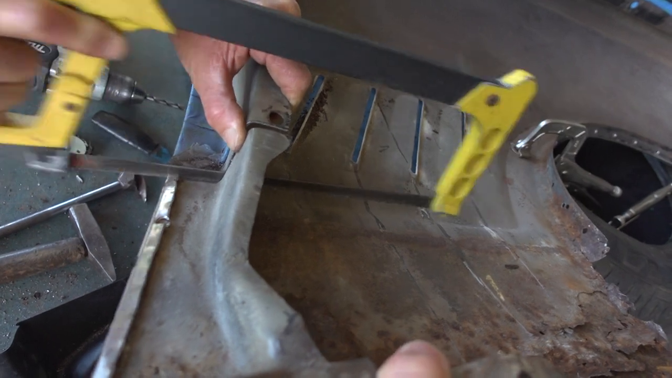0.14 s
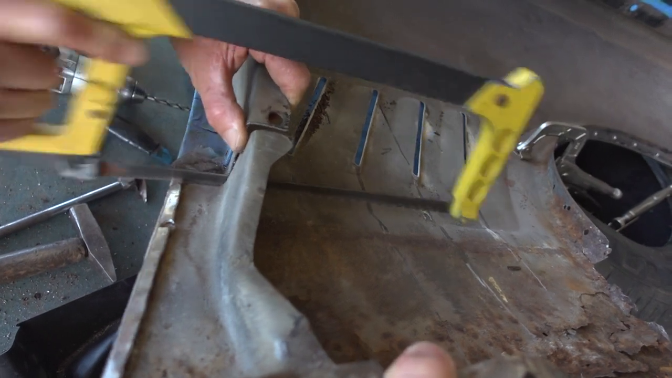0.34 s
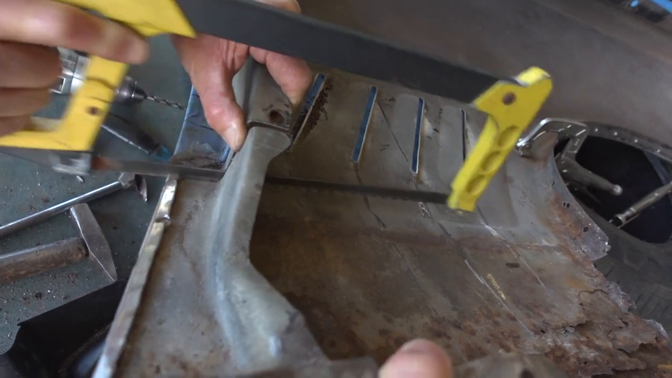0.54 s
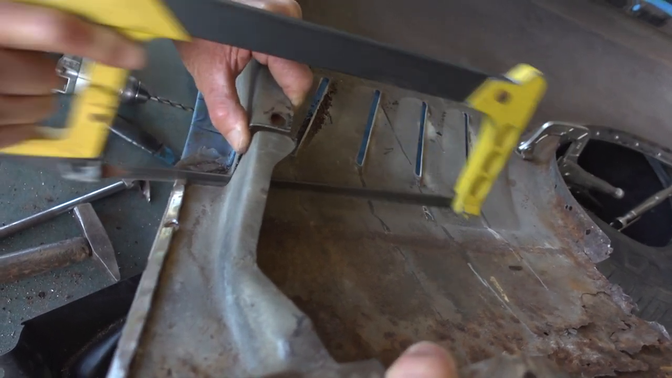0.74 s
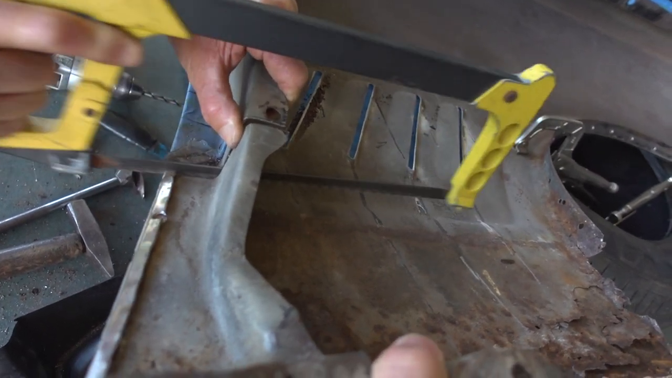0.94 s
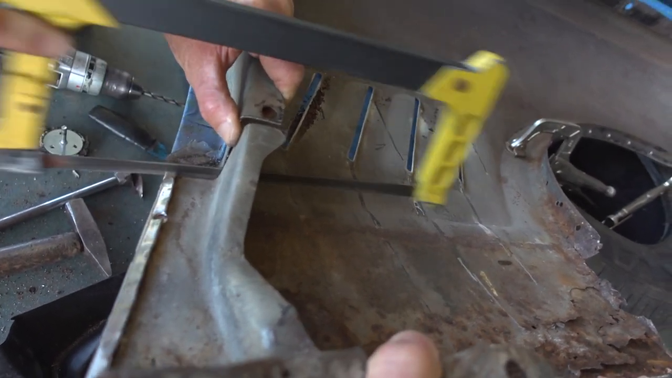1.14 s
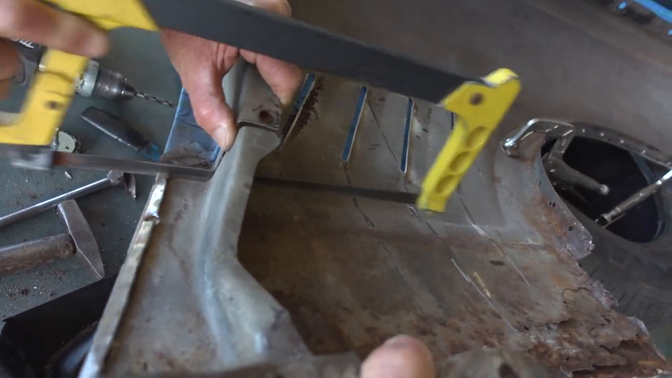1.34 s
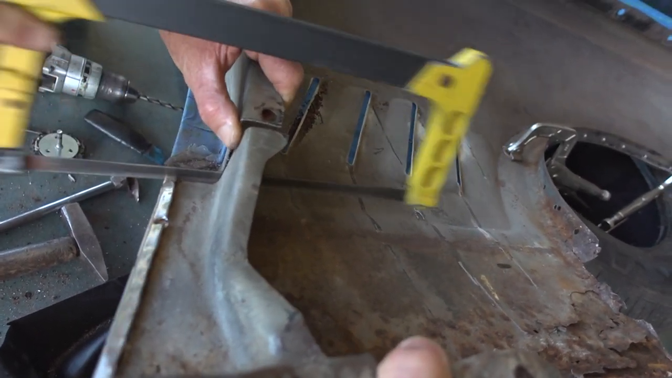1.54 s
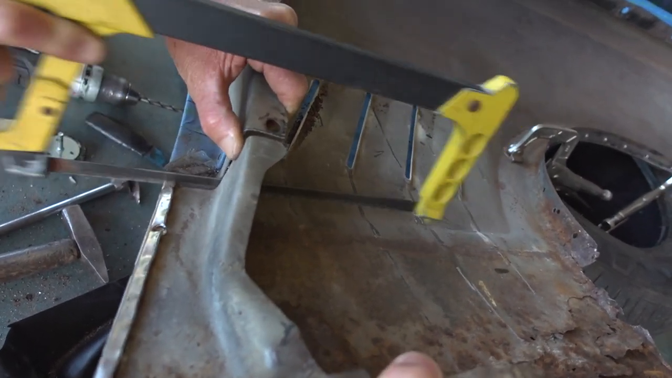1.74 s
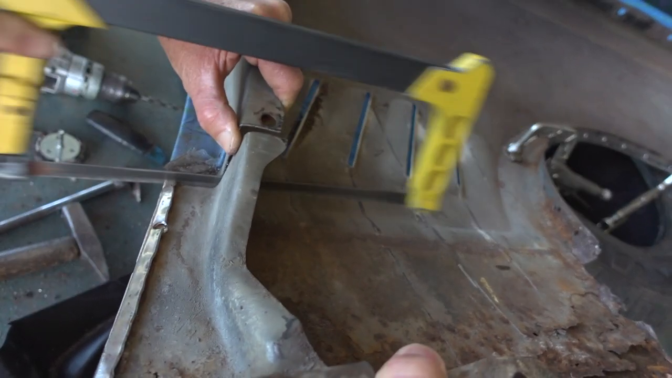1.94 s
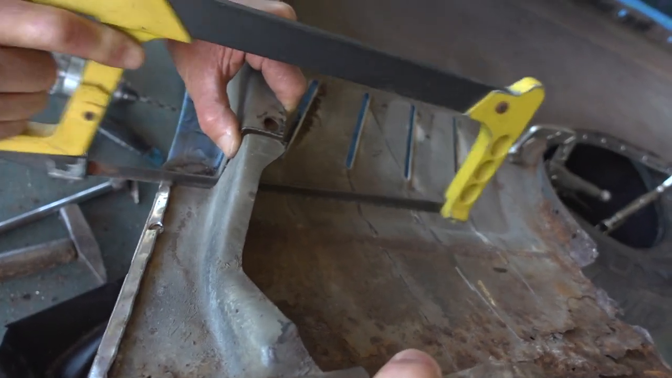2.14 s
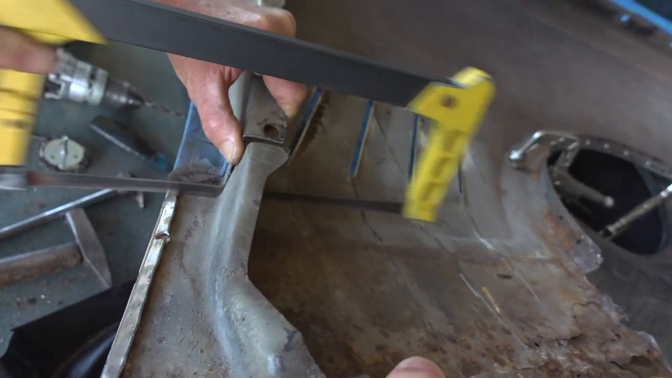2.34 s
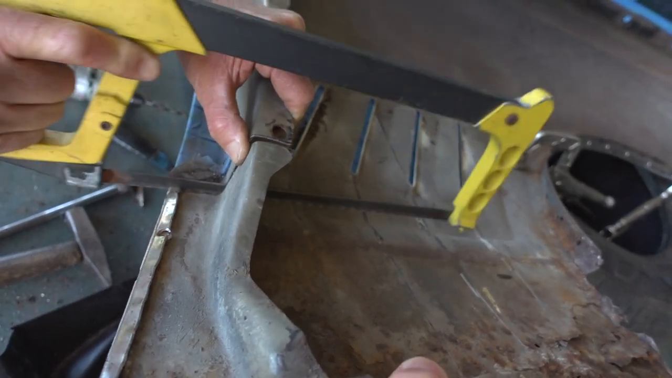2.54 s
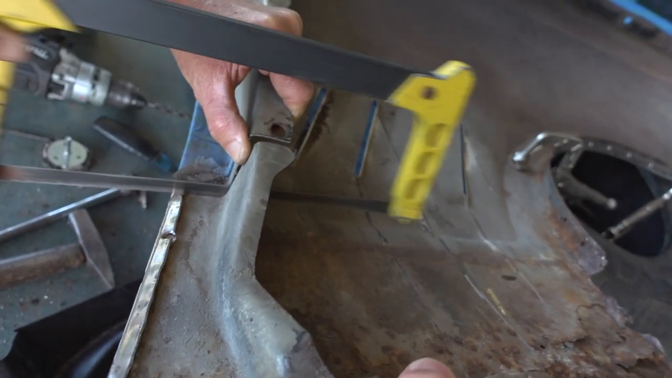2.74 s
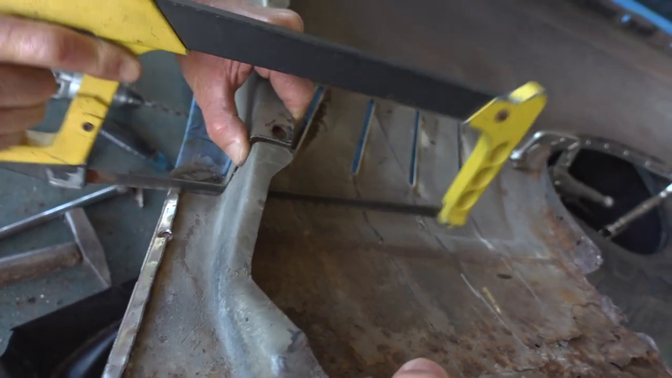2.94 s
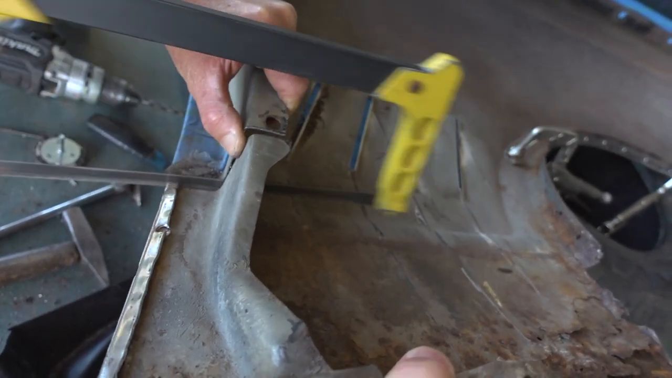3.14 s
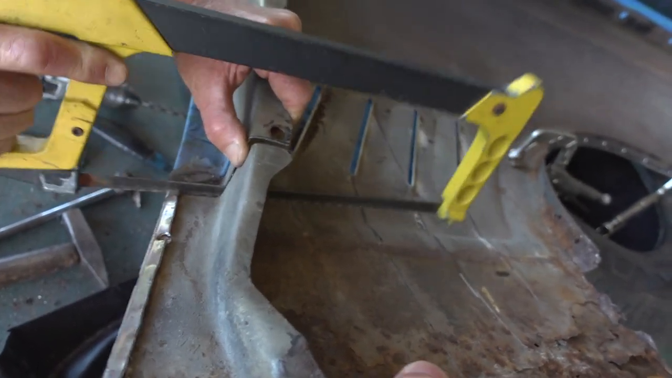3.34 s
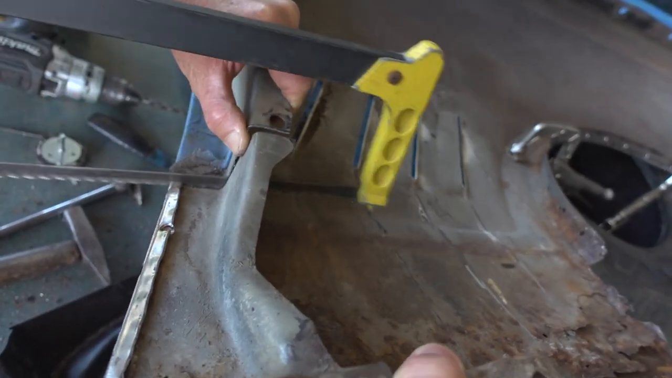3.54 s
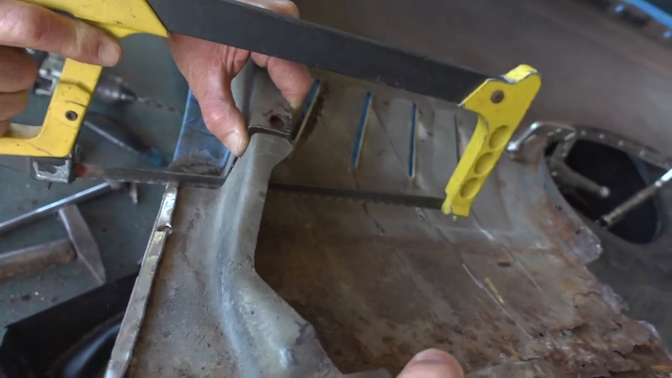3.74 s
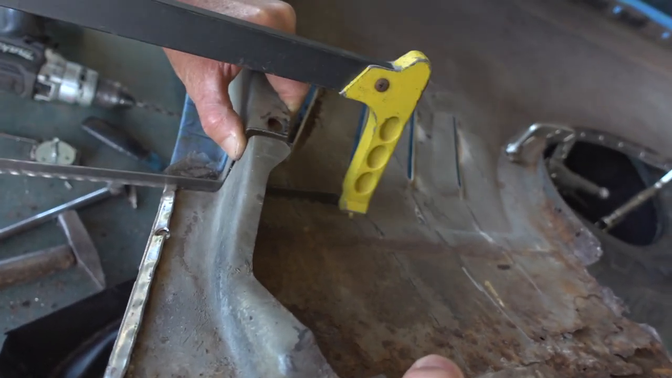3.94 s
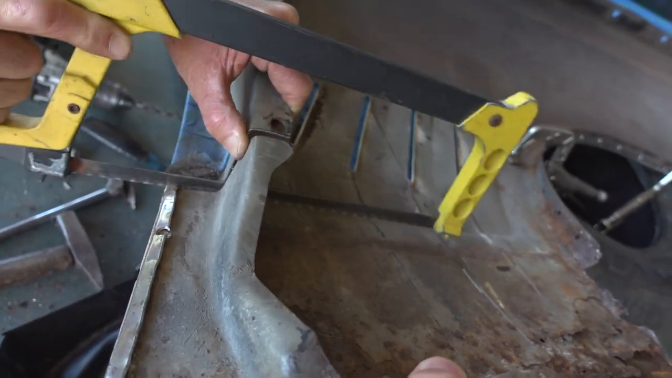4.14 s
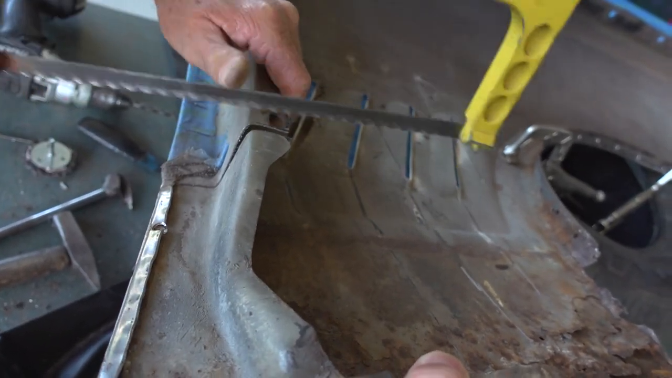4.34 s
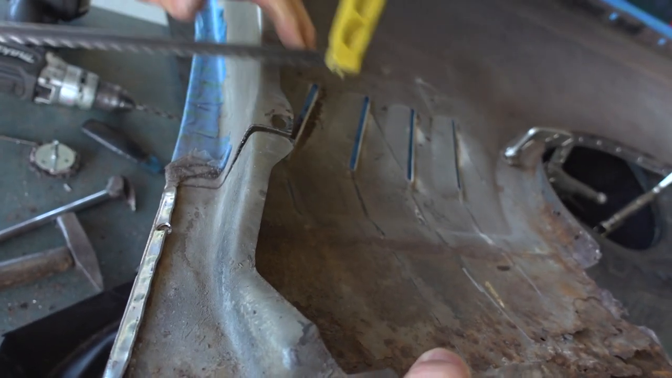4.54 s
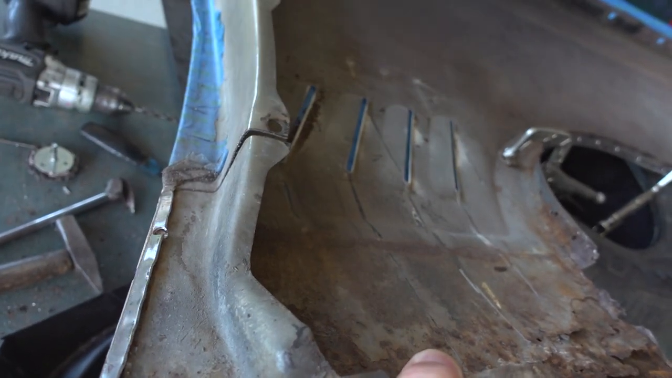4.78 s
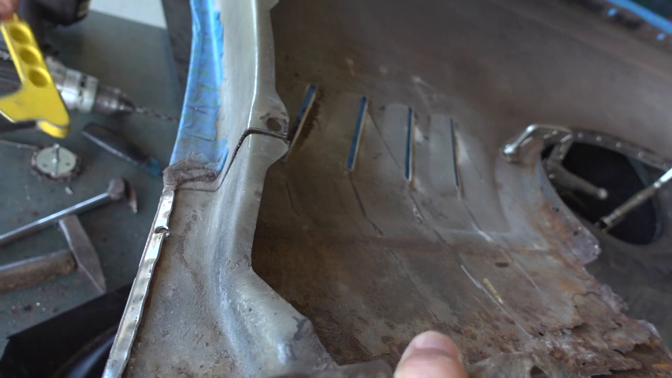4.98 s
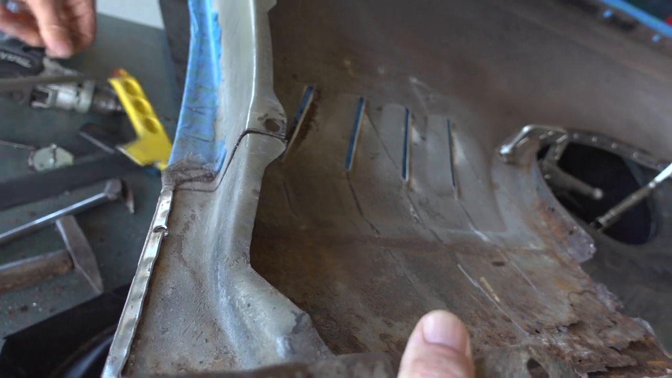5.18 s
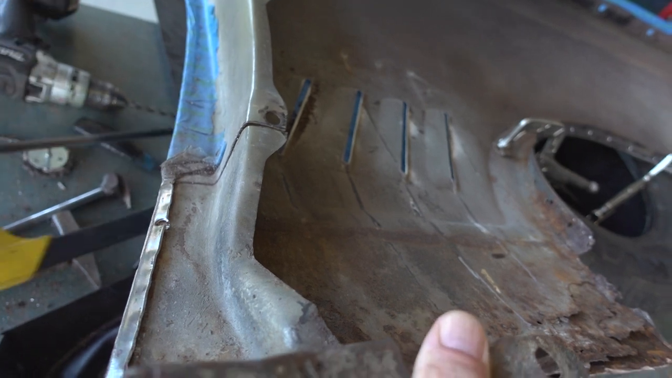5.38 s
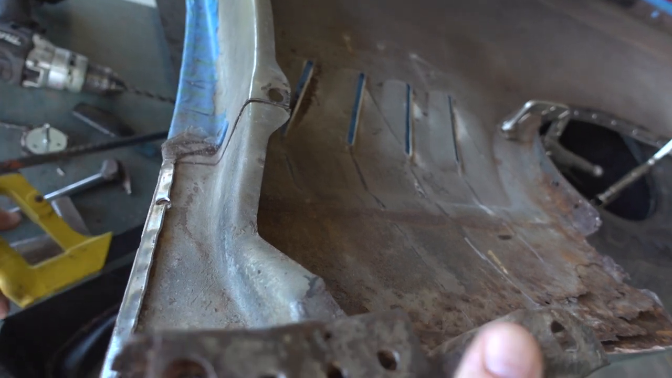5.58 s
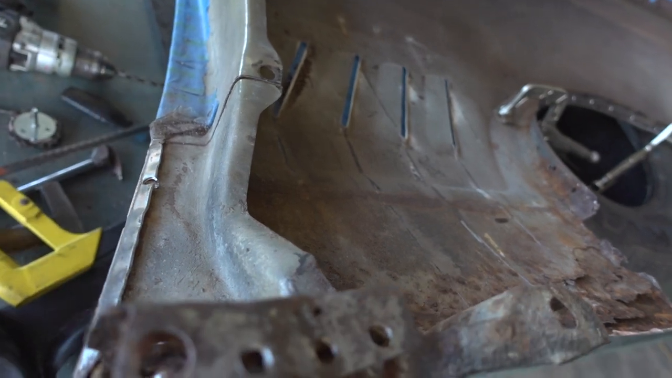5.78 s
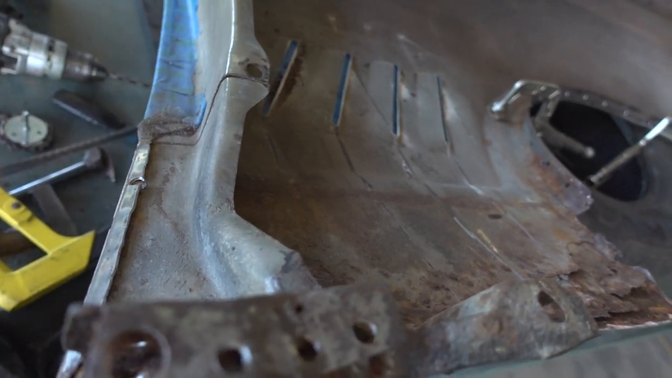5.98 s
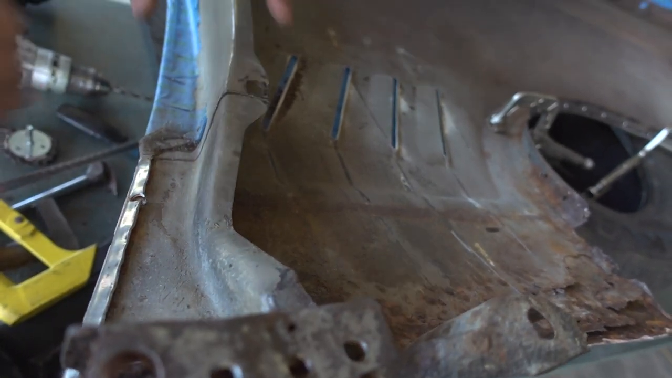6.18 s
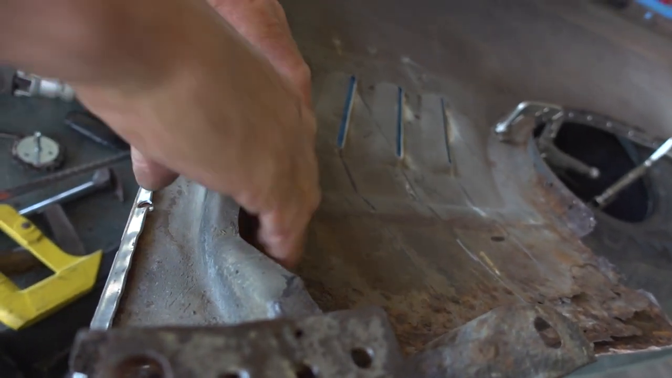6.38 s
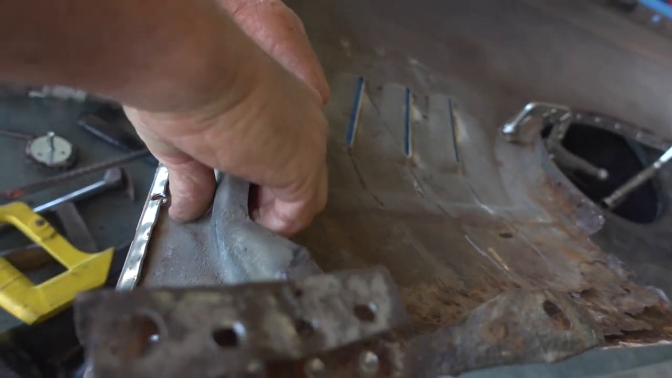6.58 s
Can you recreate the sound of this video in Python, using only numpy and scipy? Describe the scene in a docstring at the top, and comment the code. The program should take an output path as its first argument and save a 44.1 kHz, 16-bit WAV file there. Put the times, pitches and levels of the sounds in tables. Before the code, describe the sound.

Quick, hissing hacksaw strokes cut a steel panel in a workshop, followed by the saw clanking down onto loose metal tools.

```python
"""Hacksaw on a steel panel

A hand hacksaw cuts a sheet-steel body panel in a workshop, about five strokes a second. The teeth tear
off chips with a rasp and a hiss, the taut blade sings and the panel rumbles underneath. The blade snags,
then breaks out of the cut and rings. The saw is dropped among loose tools; a hand rubs the panel."""
import sys
import numpy as np
from scipy import signal
from scipy.fft import rfft, irfft, next_fast_len
from scipy.io import wavfile
from scipy.ndimage import uniform_filter1d, map_coordinates

SR = 44100
rng = np.random.default_rng(int(sys.argv[2]) if len(sys.argv) > 2 else 0)


def file_out(sig):
    """Save sig as 16-bit WAV at sys.argv[1]."""
    # one column per channel
    cols = np.atleast_2d(sig).T
    # limit, then scale
    lim = np.clip(cols, -1, 1)
    pcm = np.round(lim * 32767).astype(np.int16)
    wavfile.write(sys.argv[1], SR, pcm)


N = 291942
TIME = np.arange(N) / SR

# push and pull in turn: start/s, end/s, rise/s, level/dB, rumble surge/dB
STROKES = [(-.059, .04, 0.021, -22, -24.5), (.169, .294, .022, -20, -24.5), (.322, .442, .016, -20.5, -22),
           (.587, .697, 0.023, -20, -25.5), (.732, .839, 0.017, -21.5, -21.5),
           (.99, 1.114, .013, -20, -25.5), (1.147, 1.252, 0.015, -20.5, -27.5),
           (1.386, 1.502, 0.041, -19.5, -25.5), (1.541, 1.652, .019, -20, -23),
           (1.775, 1.906, .027, -20, -23.5), (1.936, 2.076, .019, -21, -24.5),
           (2.188, 2.317, .03, -20.5, -25), (2.356, 2.47, .015, -20, -25), (2.622, 2.733, 0.047, -19, -27),
           (2.778, 2.88, .015, -20.5, -24.5), (3.019, 3.137, 0.05, -20.5, -24.5),
           (3.172, 3.272, .017, -20.5, -26.5), (3.448, 3.56, 0.029, -20.5, -23.5),
           (3.599, 3.72, .013, -21, -25), (3.864, 3.985, .009, -19, -32), (4.017, 4.144, 0.019, -19, -25),
           (4.275, 4.345, 0.021, -22.5, -36)]
# the panel gives more as the last of the steel is cut: t/s, extra rumble/dB
LOOSENESS = [(3.45, -4.5), (3.95, 12.5), (4.13, 8), (4.24, -7.5)]


def sawing():
    """The teeth bite while the blade moves and ease off at each turn; the panel shakes under them."""
    speed, rasp, hiss, shake = arm()
    stroke_ends = np.array(STROKES)[:, :2].ravel()
    travel = np.interp(TIME, stroke_ends, np.resize([-1, 1, 1, -1], len(stroke_ends)))
    cut = cutting(speed, travel, rasp, hiss) + rasp * bending_waves(travel)
    twang = blade_song(speed / level(LOOSENESS), lag_s=.028, waver_db=2)
    return cut + twang + shake * panel_rumble(speed)


def arm():
    """The strokes as envelopes of speed, rasp, hiss and panel shake, until the blade breaks out."""
    # fall/s, hiss over rasp/dB, first surge over last/dB, last surge's decay/s
    push, pull = (.0245, 1, -4.5, .07), (.022, -.0011, -1.2, .027)
    speed, rasp, hiss, surge_power = np.zeros((4, N))
    for k, (start, end, rise, db, surge_db) in enumerate(STROKES):
        fall, hiss_db, first_db, dies_s = pull if k % 2 else push
        bite = swell(start, end, rise, fall)
        speed += bite
        rasp += from_db(db) * bite
        hiss += from_db(db + hiss_db) * bite ** 1.38  # hiss grows faster than speed
        # the rumble swells just inside each end of the stroke
        surge_power += (from_db(surge_db + first_db) * surge(start + .018, dies_s=.041)) ** 2
        surge_power += (from_db(surge_db) * surge(end - .008, dies_s)) ** 2
    breakout_s, drag = 4.334, from_db(-48.5)
    in_cut = (1 + np.tanh((breakout_s - TIME) / .008)) / 2
    loose = level(LOOSENESS)
    stroke_rumble, turn_rumble = from_db(-33.5) * loose * speed, from_db(-37.5)
    shake = np.sqrt(surge_power + stroke_rumble ** 2 + turn_rumble ** 2)
    hiss = (hiss + drag) / loose ** .36  # a loose panel hisses less
    return in_cut * np.array([speed, rasp + drag, hiss, shake])


def teeth(speed, uneven_db, friction):
    """Each tooth tears off a chip of its own size; steel slides on steel in between."""
    teeth_per_s = 1100 * speed * (1 + .17 * drift(300))
    passed = np.floor(np.cumsum(teeth_per_s) / SR)
    chip_size = from_db(uneven_db * np.clip(rng.standard_normal(N), -2, 2))
    chips = np.diff(passed, prepend=0) * chip_size / np.sqrt(speed)
    edges = rms_one(np.diff(chips, prepend=0))
    return .93 * edges + rms_one(chips - chips.mean()) + friction * rng.standard_normal(N)


def cutting(speed, travel, rasp, hiss):
    """Rasp and hiss: the chips set the grain, the stroke sets the loudness."""
    # tone curves of the cut: f/Hz, level/dB
    rasp_curve = [(700, -25), (1400, 2.5), (2100, 2), (3300, 3), (4600, 4), (5600, -16), (8000, -26)]
    hiss_curve = [(3500, -22), (5200, 5), (6500, 4.5), (8300, 3.5), (10000, -2.5), (12500, -4.5),
                  (14000, -6), (16000, -15)]
    # resonances of the strained blade: f/Hz, width/Hz, level/dB
    resonances = [(2630, 110, -2), (3300, 60, -8), (4520, 130, -8), (7480, 110, -7), (8470, 200, -4),
                  (9020, 110, -7), (13950, 140, -9)]
    # the blade's free length changes as it slides, and the grain's pitch moves with it
    slide = .03 * travel + .06 * drift(4) + .006 * drift(70)
    chips = teeth(.35 + speed * np.cos(travel), uneven_db=7, friction=.66)
    grain = retuned(sheet(chips, t60=.037, direct=.2), slide)
    grain /= np.sqrt(uniform_filter1d(grain ** 2, SR // 50) + 1e-9)
    cut = from_db(-1) * rasp * coloured(grain, rasp_curve)
    cut += from_db(-2.5) * hiss * coloured(grain, hiss_curve)
    return cut + from_db(-8) * rasp * resonate(rng.standard_normal(N), resonances)


def bending_waves(travel):
    """The blade chirps in short flares as it lengthens on one side of the cut and shortens on the other."""
    # waves of the free blade: f/Hz, level/dB
    waves = [(2500, -19), (4200, -27), (5300, -16.5), (6900, -15), (8400, -14), (10300, -21)]
    out = 0
    for k, (hz, db) in enumerate(waves):
        pitch = hz * (1 + .066 * travel * (-1) ** k + .038 * drift(4))
        flares = rms_one(drift(110) * from_db(3.5 * drift(22)))
        out += from_db(db) * flares * sine(pitch)
    return out


def blade_song(bite, lag_s, waver_db):
    """The taut blade stores the teeth's work and sings on through the turns."""
    # its two long notes: f/Hz, level/dB
    notes = [(4795, -35), (4889, -39)]
    hold = np.exp(-1 / (lag_s * SR))
    stored = signal.lfilter([1 - hold], [1, -hold], bite)
    out, shared_waver = 0, drift(7.12)
    for hz, db in notes:
        gain = from_db(db + waver_db * (shared_waver + drift(18)))
        out += gain * stored * np.sqrt(2) * sine(hz + 5 * drift(40))
    return out


def panel_rumble(speed):
    """The teeth shake the sheet steel into a dull, hollow rumble."""
    # tone curve of the rumble: f/Hz, level/dB
    rumble_curve = [(60, -52), (130, -22), (165, -4.5), (290, -6.5), (380, 0), (520, 1), (780, 1),
                    (1100, 1.5), (1500, -1.5), (2000, -16.5), (3200, -13), (6000, -30)]
    # panel resonances: f/Hz, width/Hz, level/dB
    resonances = [(235, 25, -9), (365, 48, -3), (512, 45, 0), (620, 50, -3), (804, 40, -7), (1110, 50, -5),
                  (1420, 250, 2), (2070, 80, -2)]
    chips = teeth(.3 + speed * .5, uneven_db=4.5, friction=1)
    grain = retuned(sheet(chips, t60=.021, direct=2.4), .08 * drift(9))
    hollow = resonate(rng.standard_normal(N), resonances)
    return from_db(-1) * coloured(grain, rumble_curve) + from_db(-9.5) * hollow


def squeals(rough_hz):
    """Stick-slip: the teeth lock on to one blade mode for a moment."""
    # squeals: centre t/s, half-length/s, f/Hz, glide/(Hz per s), level/dB
    chirps = [(.235, .025, 2660, -1000, -26), (.19, .02, 9050, -2000, -31), (1.025, .02, 2680, 9000, -26),
              (2.665, .025, 2620, 1500, -27), (3.05, .025, 2620, 0, -28), (3.045, .018, 1180, 0, -28),
              (3.96, .025, 1380, 0, -23), (4.095, .02, 8500, -8000, -28), (4.305, .025, 2950, -5000, -26),
              (4.295, .018, 4200, -4000, -28), (4.315, .018, 6900, -6000, -27),
              (4.32, .022, 980, -1000, -32), (4.322, .01, 10500, -8000, -29)]
    out, t = np.zeros(N), TIME[:SR // 5] - TIME[SR // 10]
    for s, half_length, hz, glide, db in chirps:
        pitch = hz + glide * t + rough_hz * rms_one(band(rng.standard_normal(len(t)), 30, 300))
        add(out, s + t[0], from_db(db) * np.sqrt(2) * np.exp(-(t / half_length) ** 2) * sine(pitch))
    return out


def snags():
    """The blade snags, then jumps out of the cut and rings."""
    # t/s, thump/dB, clank/dB, clank f/Hz, crack/dB, chatter/s, t60/s, ring/dB
    hits = [(2.17, -27, -34, 1499, -31, .004, 0.079, -48),
            (3.278, -14.5, -22.5, 1412, -25.5, 0.025, 0.2, -49),
            (3.338, -18, -16.5, 2100, -24.5, .002, 0.1, -42),
            (3.343, -21.5, -17.5, 540, -37, 0.0074, 0.23, -38), (3.808, -39, -41, 1500, -48, .004, .1, -52),
            (3.865, -40, -29, 2470, -22.5, 0.0044, 0.1, -44),
            (4.2218, -39, -43, 2207, -33, .004, 0.14, -45), (4.32, -34, -46, 2900, -33, .005, 0.083, -38),
            (4.349, -37, -31, 3800, -12.5, 0.0033, 0.064, -38),
            (4.3575, -21, -21.5, 2915, -23, 0.0028, 0.19, -17)]
    # blade modes: f/Hz, level/dB, t60/s
    modes = [(620, -20, .33), (680, -17, .38), (2670, -8, .23), (4797, -1, .16), (4899, -12, .24),
             (6858, -19, .23), (8328, -20, .18), (9480, -23, .28), (10750, -14, .08)]
    return blows(hits, modes, thump_rise_share=.066, crack_hold_share=.5)


def dropped_saw():
    """The saw lands and bounces among the tools, its frame ringing."""
    # t/s, thump/dB, clank/dB, clank f/Hz, crack/dB, chatter/s, t60/s, ring/dB
    hits = [(5.4829, -19, -20.5, 2250, -22.5, 0.13, 0.47, -27),
            (5.68, -17, -22.5, 2600, -21, 0.11, 0.44, -26),
            (5.711, -43, -21.5, 1410, -42, 0.097, 0.13, -23),
            (5.8271, -9, -41, 2200, -30, 0.0048, 0.18, -27),
            (5.899, -22, -24, 2980, -20.5, 0.025, 0.12, -24.5),
            (5.935, -21, -22.5, 2940, -25, 0.0033, 0.15, -38),
            (6.0495, -26, -25.5, 2580, -33, 0.032, 0.23, -29.5)]
    # frame modes: f/Hz, level/dB, t60/s
    modes = [(1244, -7, .4), (1474, -7, .4), (1781, 0, .5), (2135, -6, .33), (2302, -8, .33),
             (2469, -5, .33), (2584, -4.5, .34), (2669, -3, .26), (2812, -7, .24), (2907, -6, .22),
             (3031, -10, .3), (3690, -9, .33), (4005, -9, .26), (4130, -4, .27), (4710, -12, .28),
             (5060, -14, .32), (5459, -11, .2), (6094, -12, .2), (6850, -11, .16), (7430, -12, .14)]
    return blows(hits, modes, thump_rise_share=.22, crack_hold_share=.053)


def blows(hits, modes, thump_rise_share, crack_hold_share):
    """Steel chatters on its contact, then dies away; a low thump swells in just after each hit."""
    # tone curve of the thump: f/Hz, level/dB
    thump_curve = [(40, -50), (100, -27.5), (170, -9.5), (300, -7), (550, -2.5), (1000, 1), (1400, 2.5),
                   (2500, -14), (6000, -33)]
    out, t = np.zeros(N), TIME[:SR]
    for s, thump_db, clank_db, clank_hz, crack_db, chatter, t60, ring_db in hits:
        thump, clank, crack = rng.standard_normal((3, len(t)))
        thump = coloured(thump, thump_curve) * (1 - np.exp(-t / (thump_rise_share * t60)))
        clank = rms_one(band(clank, clank_hz / 1.47, clank_hz * 1.4))
        crack = rms_one(signal.lfilter([1], [1, -.6], band(crack, 3200, 10600)))
        sound = (from_db(thump_db) * thump + from_db(clank_db) * clank) * fade(t, t60, chatter)
        sound += from_db(crack_db) * crack * fade(t, t60, crack_hold_share * chatter)
        for (hz, db, mode_t60), luck in zip(modes, rng.standard_normal(len(modes))):
            # modes come in close pairs that beat; chatter feeds them before they ring out
            beat = 1 + .45 * np.cos(2 * np.pi * 11 * luck * t)
            ring = from_db(ring_db + db + 2 * luck) * fade(t, mode_t60, chatter / 2)
            sound += np.sign(luck) * beat * ring * np.sin(2 * np.pi * hz * t)
        add(out, s, sound)
    return out


def handling_ticks():
    """Light contacts click with a short steel ring."""
    # ticks: t/s, relative level/dB
    ticks = [(4.813, -41), (4.9195, -45), (4.931, -40.5), (4.99, -41.5), (5.044, -41), (5.0603, -42),
             (5.289, -41), (5.466, -43), (6.3165, -48), (6.466, -38.5), (6.555, -28), (6.61, -36)]
    out, t = np.zeros(N), TIME[:SR // 5]
    for s, db in ticks:
        noise = rng.standard_normal(len(t))
        click = rms_one(band(noise, 1500, 10200)) * fade(t, t60=.038)
        ring = from_db(-6.5) * rms_one(band(noise, 3300, 5050)) * fade(t, t60=.1)
        add(out, s, from_db(db - 4) * (click + ring))
    return out


def rubbing():
    """Hands and tool slide over steel, above a faint bed of the same noise."""
    # slides: start/s, end/s, level/dB
    slides = [(4.79, 5.06, -73), (5.186, 5.5, -56), (6.313, 6.36, -48.5), (6.428, 6.7, -49)]
    # tone curve of the friction: f/Hz, level/dB
    rub_curve = [(35, -53), (60, -34), (300, -22), (600, -8.5), (1220, -8.5), (1740, -4), (3340, -7),
                 (6000, -11.5), (16000, -24)]
    sliding = sum(from_db(db) * swell(start, end, .03, .046) for start, end, db in slides)
    friction = coloured(sheet(rng.standard_normal(N), t60=.12, direct=1), rub_curve)
    return (from_db(-59) + sliding) * friction * from_db(2.7 * drift(36))


def frame_hum():
    """One long frame mode sounds while the saw is moved, and lingers once it lies still."""
    hum = resonate(rng.standard_normal(N), [(1780, 14, 0)])
    return from_db(-55) * swell(5.225, 6.35, attack=.015, release=.2) * hum


def workshop(x):
    """The room's diffuse tail, longest in the low mids and dying faster in the treble."""
    # reverb time: f/Hz, t60/s
    decay_curve = [(100, 0.2), (600, 0.87), (2000, 0.52), (5000, 0.48), (15000, 0.36)]
    t, tail = TIME[:SR], 0
    for low in 60 * 2. ** np.arange(8):
        octave = band(rng.standard_normal(len(t)), low, 2 * low)
        tail += octave * fade(t, at_hz(decay_curve, low * np.sqrt(2)))
    tail *= 1 - np.exp(-t / .032)
    return signal.fftconvolve(x, tail / np.linalg.norm(tail))[:N]


def placed(x, lean, width_db):
    """Two close microphones: alike in the bass, drifting apart and leaning left in the treble."""
    apart = lean * x + from_db(width_db) * retuned(sheet(x, t60=.23, direct=0), .006 * drift(22))
    side = .71 * band(apart, 730, 20000) + .47 * band(apart, 4000, 20000)
    return x + side * [[1], [-1]]


def sheet(x, t60, direct):
    """Waves bounce about in thin steel: countless close modes, spread evenly and ringing briefly."""
    t = TIME[:SR // 4]
    modes = rfft(rng.standard_normal(len(t)) * fade(t, t60))
    modes /= np.sqrt(uniform_filter1d(abs(modes) ** 2, size=160))
    ringing = irfft(modes, len(t))[:len(t) - SR // 100]
    return signal.fftconvolve(x, ringing / np.linalg.norm(ringing))[:N] + direct * x


def resonate(x, resonances):
    """Parallel resonances (f/Hz, width/Hz, level/dB) on one drive; rms 1."""
    out = 0
    for hz, width, db in resonances:
        r = np.exp(-np.pi * width / SR)
        poles = [1, -2 * r * np.cos(2 * np.pi * hz / SR), r * r]
        out += from_db(db) * rms_one(signal.lfilter([1, 0, -1], poles, x))
    return rms_one(out)


def retuned(x, shift):
    """Every resonance in x slides by the given share of its pitch."""
    return map_coordinates(x, [np.arange(N) + np.cumsum(shift - shift.mean())], order=3, mode="mirror")


def coloured(x, curve):
    """A sound shaped by a tone curve; rms 1."""
    size = next_fast_len(len(x))
    gain = from_db(at_hz(curve, np.fft.rfftfreq(size, 1 / SR)))
    return rms_one(irfft(rfft(x, size) * gain, size)[:len(x)])


def surge(s, dies_s, build_s=.042):
    """Builds up to 1 at time s and dies away."""
    return np.exp(-np.maximum((s - TIME) / build_s, (TIME - s) / dies_s))


def swell(start, end, attack, release):
    """Rises smoothly towards 1 around start, falls around end."""
    return (1 + np.tanh((TIME - start) / attack)) / 2 * (1 + np.tanh((end - TIME) / release)) / 2


def fade(t, t60, hold_s=0):
    """Holds at 1, then falls 60 dB every t60 seconds."""
    return from_db(-60 * np.maximum(t - hold_s, 0) / t60)


def drift(rate):
    """Random wander through `rate` points a second; rms 1."""
    knots = rng.standard_normal(4096)
    return rms_one(np.interp(TIME * rate, np.arange(len(knots)), knots))


def level(rows):
    """Gain over time from rows of t/s, level/dB."""
    return from_db(np.interp(TIME, *np.transpose(rows)))


def at_hz(curve, hz):
    """A curve's value on a log-frequency axis."""
    freqs, values = np.transpose(curve)
    return np.interp(np.log(hz + 1e-9), np.log(freqs), values)


def band(x, low_hz, high_hz):
    return signal.sosfilt(signal.butter(2, [low_hz, high_hz], "band", fs=SR, output="sos"), x)


def sine(hz):
    return np.sin(2 * np.pi * np.cumsum(hz) / SR)


def add(out, s, sound):
    """Mix a sound in at time s."""
    i = max(round(s * SR), 0)
    out[i:i + len(sound)] += sound[:N - i]


def from_db(db):
    return 10 ** (np.asarray(db) / 20)


def rms_one(x):
    return x / np.sqrt(np.mean(x ** 2) + 1e-20)


def scene():
    """The cut sits near the centre; the drop and the handling are further left and a little wetter."""
    saw = sawing() + squeals(rough_hz=27) + snags()
    aside = dropped_saw() + handling_ticks() + rubbing() + frame_hum()
    saw += from_db(-18.5) * workshop(saw)
    aside += from_db(-16.5) * workshop(aside)
    return placed(saw, lean=.049, width_db=-15) + placed(aside, lean=.21, width_db=-12)


def record(dry):
    """The microphone sheds the deep bass, peaks are rounded, the top is cut."""
    thin = signal.sosfilt(signal.butter(3, 105, "high", fs=SR, output="sos"), dry)
    rounded = .98 * np.tanh(thin / 1.017)
    return signal.sosfiltfilt(signal.ellip(10, .1, 60, 16000, fs=SR, output="sos"), rounded)


dry = scene()
out = record(dry)
file_out(out)
```